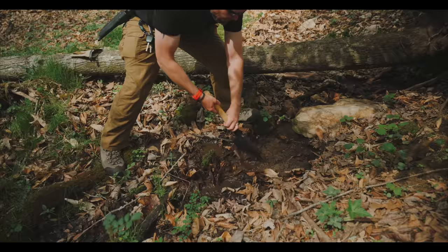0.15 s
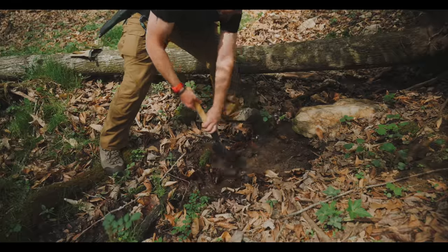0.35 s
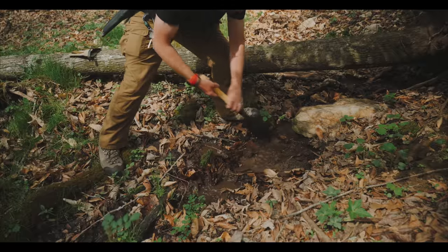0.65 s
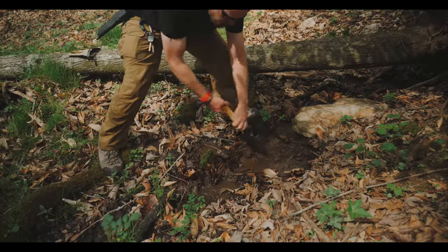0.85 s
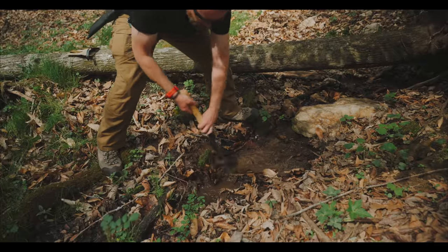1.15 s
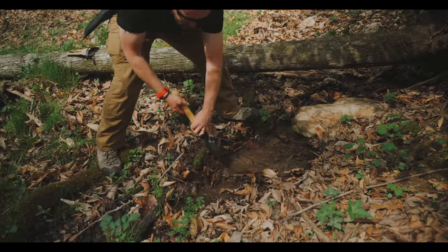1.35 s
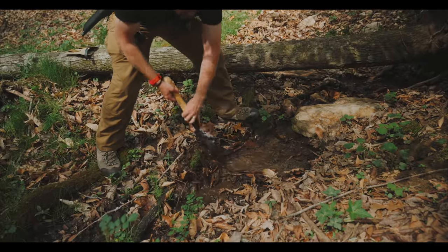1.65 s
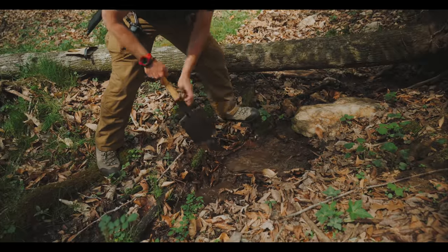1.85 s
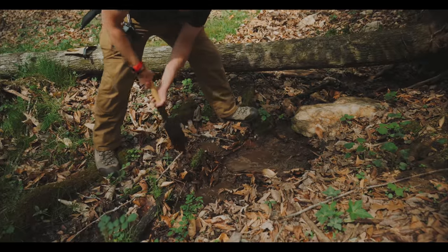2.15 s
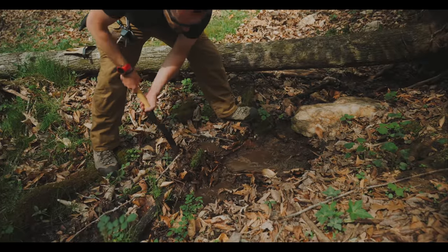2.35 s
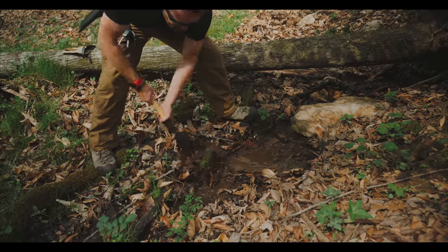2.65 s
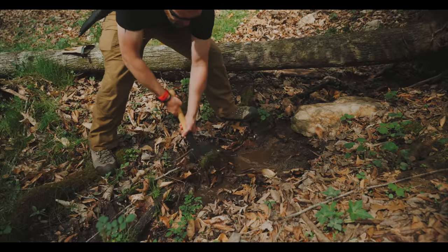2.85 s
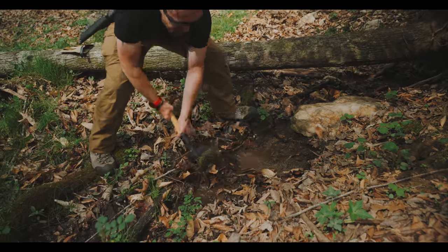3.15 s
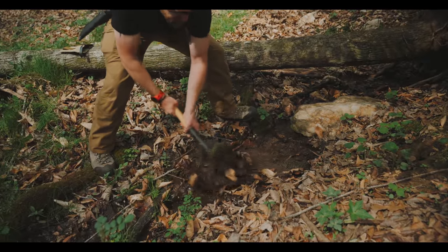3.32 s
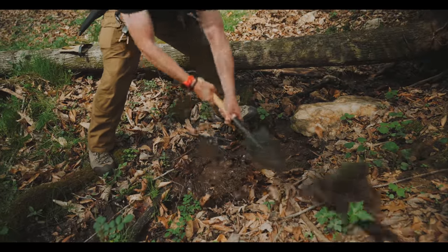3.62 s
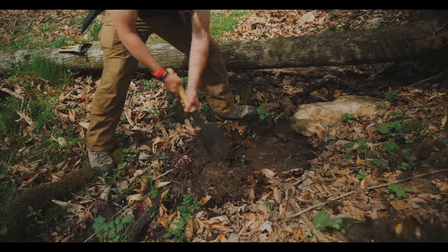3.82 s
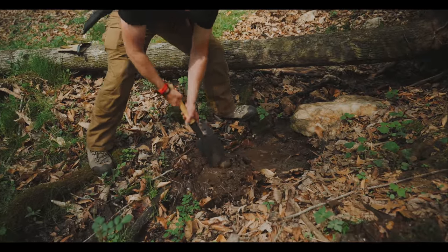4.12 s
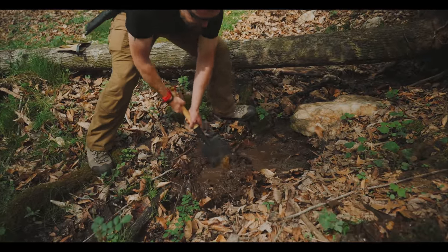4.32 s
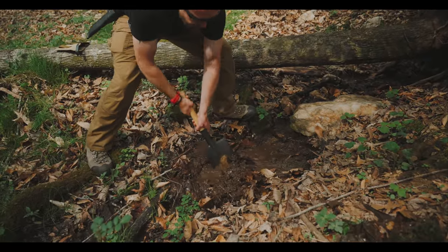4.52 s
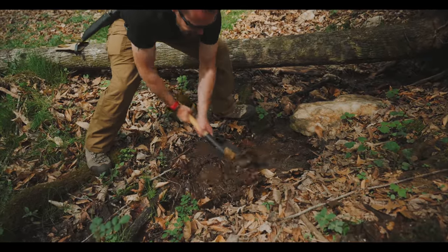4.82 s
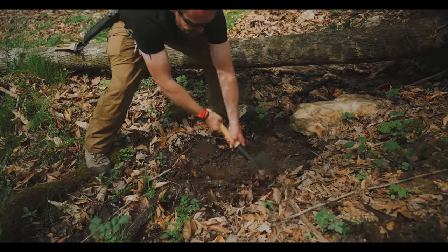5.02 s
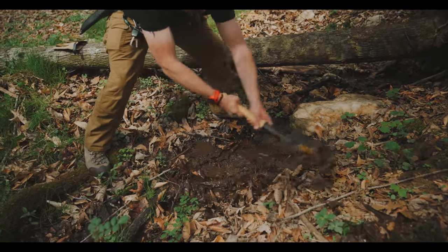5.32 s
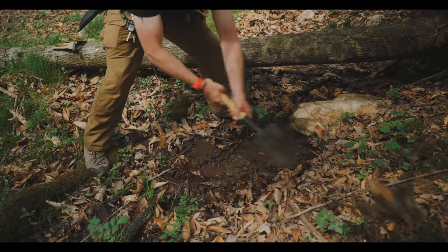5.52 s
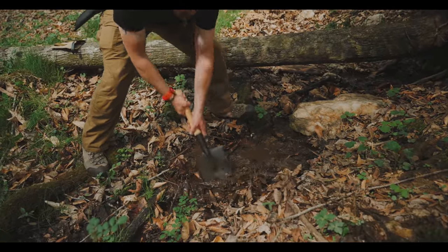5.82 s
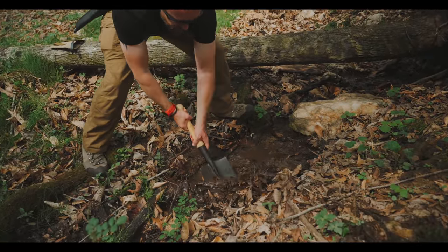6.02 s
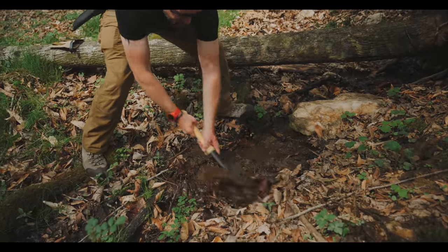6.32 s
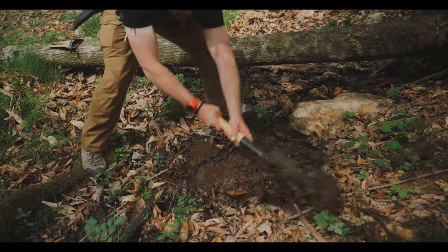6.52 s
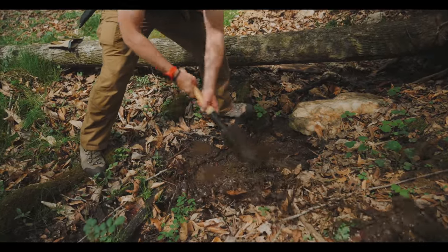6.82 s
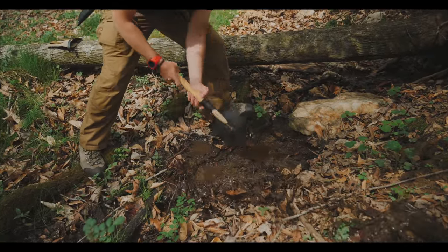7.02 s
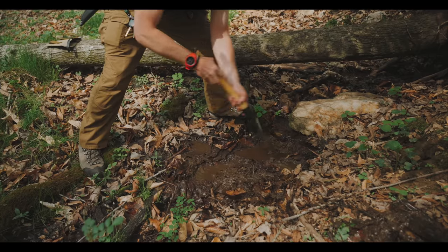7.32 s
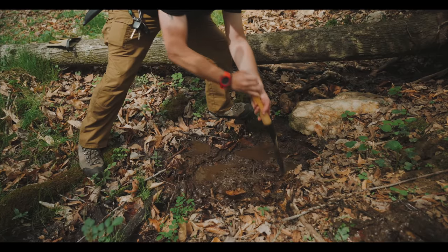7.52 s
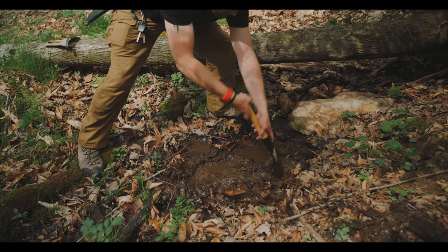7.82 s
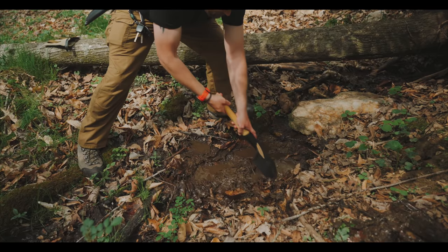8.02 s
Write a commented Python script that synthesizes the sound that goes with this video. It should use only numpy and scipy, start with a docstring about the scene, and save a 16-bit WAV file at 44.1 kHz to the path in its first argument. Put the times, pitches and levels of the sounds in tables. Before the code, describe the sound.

Close-up digging in a wood. Loud, clattering stone blows come first, then a strong crunch, lighter scrapes, and another run of thuds midway. Thrown earth scatters crisply over leaves, crumbs trickle, and pebbles ping faintly on the blade. The end is sparse, with small ticks and a last soft bite. Dry, close outdoor sound with faint air hiss and low wind bumps.

```python
"""Stones knock a small steel shovel as it chops and scrapes wet, stony mud in a wood and throws it on dry leaves.
Blows are noise bursts through a thud band, stone rings and blade modes; crackle is grainy, coloured noise
with single crumbs. Decaying sines give gliding plops of air pockets and faint steady rings and squeaks,
some of them the blade; short noise ticks snap, and pebbles ring the lifted blade.
Light wind thumps on the microphone over a faint outdoor hiss."""
import sys
import numpy as np
from scipy import signal
from scipy.io import wavfile

SR = 44100
rng = np.random.default_rng(int(sys.argv[2]) if len(sys.argv) > 2 else 0)


def output_pcm(signal):
    """Save a mono or channel-first signal as 16-bit PCM at the path in sys.argv[1].

    Samples are clipped to [-1, 1] before scaling.
    """
    pcm = np.clip(np.atleast_2d(signal).T, -1, 1) * 32767
    wavfile.write(sys.argv[1], SR, np.round(pcm).astype(np.int16))


N = 359856

# blows on stones and clods: start_s, peak_db, thud_hz, grit_db, length_s
BLOWS = [(0.052, -9, 2040, 28, 0.016), (0.095, -1.5, 2150, -2, 0.016), (0.117, 4.5, 2880, 8, 0.008),
         (0.126, 0, 2400, 28, 0.0098), (0.139, -8, 2100, -10, 0.0028), (0.158, 0.5, 2080, 12, 0.0067),
         (0.1485, 3, 2120, 0, 0.0051), (0.181, 4, 1470, 15, 0.015), (0.194, -0.5, 2150, 18, 0.011),
         (0.2203, 0.5, 2250, -8, 0.004), (0.234, 1, 2400, 37, 0.015), (0.269, -8, 1700, -7, 0.0028),
         (0.883, -12.5, 2600, -2, 0.017), (0.8934, -0.5, 3030, 5, 0.009), (1.0005, 4, 2100, -1, 0.0038),
         (1.009, -4, 1950, -6.5, 0.032), (1.034, 2.5, 2280, 8, 0.012), (1.1163, -1, 2455, -3.5, 0.0036),
         (1.45, -13.5, 4120, 5, 0.015), (2.051, -14, 3220, -9, 0.0064), (2.588, -15.5, 2500, -10, 0.0052),
         (3.309, -22.5, 2360, -3.5, 0.027), (3.459, -6, 3140, 37.5, 0.0089), (3.704, -9.5, 3790, -20, 0.01),
         (4.154, 0.5, 2040, -6, 0.0053), (4.213, -3, 1466, -5.5, 0.024), (4.259, -12, 1420, -7.5, 0.022),
         (4.383, -5.5, 1880, -5, 0.039), (4.518, -10, 2060, 4, 0.0087), (4.805, -2, 1530, -8, 0.0025),
         (4.931, 0.5, 1460, -3.5, 0.0058), (5.06, -12, 3440, -2, 0.0082), (5.41, -12.5, 3440, -25, 0.0083),
         (5.9, 1, 2254, -11, 0.0089), (5.91, -7.5, 340, 3, 0.0085), (5.963, -13, 1315, -17, 0.0074),
         (8.014, -22.5, 1850, -9, 0.012), (8.039, -7.5, 2840, 2, 0.0065), (8.084, -17, 3330, 4.5, 0.011)]


def amp(db):
    """Decibels to gain."""
    return 10 ** (np.asarray(db) / 20)


def evened(x):
    """Scales to unit rms."""
    return x / np.sqrt(np.mean(x ** 2) + 1e-20)


def add(mix, start_s, sound):
    """Mixes a sound in at start_s."""
    part = mix[round(start_s * SR):][:len(sound)]
    part += sound[:len(part)]


def coloured(x, spectrum):
    """Causal minimum-phase filter of unit energy with the given spectrum."""
    hz, db = np.transpose(spectrum)
    grid_hz = abs(np.fft.fftfreq(4096, 1 / SR))
    log_gain = np.log(amp(np.interp(np.log(grid_hz + 1), np.log(hz), db)))
    response = np.exp(np.conj(signal.hilbert(log_gain)))
    fir = np.fft.ifft(response).real[:2048]
    return signal.oaconvolve(x, fir / np.linalg.norm(fir))[:len(x)]


def impacts(per_s, spread_db):
    """Random impulses at a mean rate, a few of them large."""
    size = amp(spread_db * np.minimum(rng.exponential(1, N), 4))
    return size * (rng.random(N) < per_s / SR)


def grains(per_s, spread_db, decay_s):
    """An envelope of random little impacts, each swelling and dying fast."""
    power = impacts(per_s, spread_db) ** 2
    pole = [1, -amp(-200 / (decay_s * SR))]
    for _ in range(2):
        power = signal.lfilter([1], pole, power)
    return evened(np.sqrt(power))


def ring(modes, sharp_db_per_oct=0, freedom=1, luck_db=0):
    """Decaying sine modes after one tap; a sharp tap reaches the high modes, freedom scales t60."""
    t = np.arange(SR // 2) / SR
    hz, db, t60_s = np.transpose(modes)[:, :, None]
    db = db + sharp_db_per_oct * np.log2(hz / 5000) + luck_db
    partials = amp(db - 60 * t / (t60_s * freedom)) * np.sin(2 * np.pi * hz * t)
    return partials.sum(0) / np.linalg.norm(amp(db))


def crumbs(per_s, spread_db):
    """Single crumbs: short ticks of a few cycles, each at one of 24 pitches."""
    size = impacts(per_s, spread_db)
    kind = rng.integers(0, 24, N)
    out, t = np.zeros(N), np.arange(SR // 50) / SR
    for k, hz in enumerate(np.geomspace(1200, 7500, num=24)):
        cycles = hz * t
        tick = np.sqrt(hz) * cycles * np.exp(-cycles / 1.6) * np.sin(2 * np.pi * cycles)
        out += signal.oaconvolve(size * (kind == k), tick)[:N]
    return evened(out)


def motion():
    """Level and dryness of moving grit: showers swell and die, their power weights the dryness."""
    # scrapes, slides and showers of soil: peak_s, relative level_db,
    # rise_s from 20 dB down, fall_s to 20 dB down (signs of both ignored), leaves_to_earth_db
    showers = [(.04, -26, 7, 0.34, 20.5), (0.201, -15.5, 0.37, 0.064, -2.5), (.325, -23, .03, .04, 3),
               (.4, -34, .3, .35, 3), (.545, -19, .025, .11, 5), (0.991, -6, 0.0321, 0.07, -3),
               (1.124, -14.5, -0.01, 0.12, -4), (0.954, -11.5, -0.0172, 0.12, 9),
               (1.47, -20.5, 0.0547, 0.03, 7), (1.731, -38.5, 1.06, 0.4, 8), (2.11, -43, 0.1, 0.6, 7),
               (2.489, -17, 0.0469, 0.0561, 3), (2.605, -23, 0.1162, 0.12, 5),
               (2.776, -26.5, 0.07, 0.26, 1.5), (3.44, -25.5, 0.31, .5, 3.5),
               (3.777, -9.5, 0.1736, 0.0743, 0.5), (3.952, -27, .5, 0.04, -2), (4.56, -27, 0.22, 0.07, 4),
               (4.2, -33, 1.34, 0.13, -2), (4.743, -31.5, .07, .5, -0.5), (4.95, -19.5, 0.1354, 0.25, 0),
               (5.278, -28.5, 0.2, 0.76, 8), (5.666, -19, 0.1459, 0.077, -4.5),
               (5.949, -33, 0.3, 0.09, -6.5), (6.28, -34.5, 0.23, 0.8, 8.5), (6.37, -13, .04, .2, 6),
               (6.45, -11, .1, .1, 3), (6.618, -26.5, 0.14, 0.34, 5.5), (6.746, -23, 0.11, 0.26, -2),
               (6.889, -28.5, 0.17, 0.17, 4), (7.38, -46, 0.5, 0, 8), (7.585, -30, .01, .08, 5),
               (7.625, -23, .035, .05, -3), (7.66, -23, .03, .045, -5), (7.53, -45, -0.24, 1, 10),
               (7.85, -44, 0.3, 16, 12.5), (8.05, -39, -0.44, 17, 1)]
    bend = 1.28  # above 1: rounded peak, ever faster stop
    peak_s, db, rise_s, fall_s, dry_db = np.transpose(showers)[:, :, None]
    t = np.arange(0, N + 64, 64) / SR
    away = np.maximum((peak_s - t) / abs(rise_s), (t - peak_s) / abs(fall_s))
    power = amp(db - 20 * away ** bend) ** 2
    total = power.sum(0)
    level_db = 10 * np.log10(total)
    mean_dry_db = (power * dry_db).sum(0) / total
    return [np.interp(np.arange(N) / SR, t, curve) for curve in (level_db, mean_dry_db)]


def crackle():
    """Grit and leaves on the move: clumped grains in two colours with single crumbs on top."""
    # wet earth: freq_hz, relative density_db (per Hz)
    dull = [(263, -23.5), (430, -10), (640, -11), (938, -4.5), (1810, -4), (4050, -6.5), (7000, -10.5),
            (9100, -16), (15400, -120)]
    # dry leaves and sand: freq_hz, relative density_db (per Hz)
    crisp = [(1760, -17.5), (3000, -6.5), (4500, -7), (12300, -8.5), (13600, -9.5), (16000, -17)]
    level_db, dry_db = motion()
    clumps = 1.5 + grains(90, 2.5, .03)
    earth = rng.standard_normal(N) * clumps * grains(900, 2.6, .018)
    leaves = rng.standard_normal(N) * clumps * grains(1800, 2.1, .009)
    # a thin trickle shows its single crumbs best
    loose = amp(-1.5 - .35 * (level_db + 35)) * crumbs(320, 4.5)
    low = evened(coloured(earth, dull)) + loose
    high = evened(coloured(leaves, crisp))
    tilt = amp(dry_db / 2)
    return amp(level_db - 8.5) * (low / tilt + tilt * high)


def wind():
    """Lumpy gusts over a light breeze; the microphone's bass cut leaves a thump near 70 Hz."""
    # gusts: middle_s, level_db, half_length_s
    gust_rows = [(3.693, -50.5, 0.046), (3.86, -46, 0.061), (5.77, -57, 0.064), (6.613, -43.5, 0.094),
                 (6.87, -57, 0.1), (7.189, -41, 0.037), (7.336, -41, 0.063)]
    spectrum = [(20, -8), (45, -46), (72, 38.0), (90, 13.5), (130, -32), (400, -75)]  # freq_hz, relative_db
    thump = coloured(rng.standard_normal(N), spectrum)
    t = np.arange(N) / SR
    gusts = sum(amp(db) * np.exp(-((t - mid_s) / half_s) ** 2) for mid_s, db, half_s in gust_rows)
    return (amp(-68.0) + gusts) * evened(thump)


def hiss():
    """Faint outdoor hiss: steady coloured noise."""
    # hiss: freq_hz, relative density_db (per Hz)
    spectrum = [(53, -78), (90, -10), (419, -9.5), (690, -19), (876, -10.5), (1090, -13.5), (16000, -19)]
    return amp(-54.5) * evened(coloured(rng.standard_normal(N), spectrum))


def knocks():
    """A ragged noise push drives a hollow thud, a ringing stone, a spray of grit and the steel."""
    # blade against the soil: mode_hz, relative level_db, t60_s before the freedom factor
    grounded = [(436, -12, .05), (850, -3, .045), (1340, -10, .04), (2030, -1, .065), (2620, -10, .04),
                (3530, -9, .035), (4240, -14, .04), (6500, -12, .04), (8150, -12, .03)]
    # bare blade, bright: ring_db, sharp_db_per_oct, freedom (factor on t60)
    bare = (-9, 1, .9)
    # blade caked with mud, short and low: ring_db, sharp_db_per_oct, freedom (factor on t60)
    caked = (-12, -2.5, .7)
    caked_from_s = 1.3
    out, t = np.zeros(N), np.arange(SR // 8) / SR
    noise = rng.standard_normal((len(BLOWS), len(t)))
    luck_db = 1.8 * rng.standard_normal((len(BLOWS), len(grounded), 1))
    ragged = .5 + grains(400, 2.4, .015)
    octaves = rng.uniform(-.4, 1.1, (len(BLOWS), 6))  # every stone has a few short rings of its own
    for (start_s, db, hz, grit_db, length_s), z, chance_db, own in zip(BLOWS, noise, luck_db, octaves):
        ring_db, sharp_db, freedom = bare if start_s < caked_from_s else caked
        sharp_db += 3 * np.log2(hz / 2000)  # a small hard stone reaches the high modes

        # a long crunch starts softly, holds its level, then stops short
        drawn = np.clip(length_s / .008, 1, 4)
        attack = np.minimum(t / (.0006 * drawn ** 1.5), 1)
        decay = np.exp(-(t / max(length_s, .001)) ** drawn)
        first_bite = 1.8 / drawn * np.exp(-t / .0015)
        bites = np.resize(ragged[round(start_s * SR):], len(t)) + first_bite
        push = attack * decay * z * bites

        band = signal.butter(2, [hz / 1.98, min(hz * 1.91, SR / 3)], "band", fs=SR, output="sos")
        thud = signal.sosfilt(band, push) * np.sqrt(SR / 4 / hz)
        grit = amp(grit_db) * signal.lfilter([1, -1], [1, -.7], push)
        blade = ring(grounded, sharp_db, freedom, chance_db)
        steel = signal.oaconvolve(push / np.linalg.norm(push), blade)
        stone_ring = ring([(f, 0, .035) for f in hz * 2 ** own])[:len(t)]
        stone = signal.oaconvolve(push, stone_ring)[:len(t)]
        stone *= np.linalg.norm(thud) / np.linalg.norm(stone)
        crunch = .8 * thud + .65 * stone + grit
        add(out, start_s, amp(db) * crunch / abs(crunch).max())
        # a long crunch keeps feeding the steel
        add(out, start_s, amp(db + ring_db) * np.sqrt(drawn) * steel)
    return out


def tones():
    """Decaying sines: glides for plopping air pockets, softer onsets for faint steady rings and squeaks."""
    # gliding plops of air pockets, and faint steady rings and squeaks, some of them the blade:
    # start_s, peak_db, start_hz, rise_oct_per_s, t60_s
    tone_rows = [(.313, -22, 1200, 3, .04), (.4575, -17, 880, 46, .07), (.527, -17, 2150, -12, .05),
                 (.5355, -4, 1650, 4, .016), (4.9305, -1, 950, 2, .035), (5.064, -18, 600, -5, .06),
                 (2.053, -21, 3144, .1, .09), (8.029, -19, 1980, 1, .05), (4.23, -32, 6720, 0, .13),
                 (7.045, -31, 1250, 0, .07), (7.045, -33, 960, 0, .14), (7.0, -51, 2160, 0, 2),
                 (7.295, -44, 2180, 0, .25)]
    out, t = np.zeros(N), np.arange(SR // 2) / SR
    for start_s, db, hz, rise, t60_s in tone_rows:
        turns = np.cumsum(hz * 2 ** np.minimum(rise * t, 2)) / SR  # rises two octaves at most
        attack = np.minimum(t / (.0015 if rise else .012), 1)
        add(out, start_s, amp(db - 60 * t / t60_s) * attack * np.sin(2 * np.pi * turns))
    return out


def snaps():
    """A tick of noise that rings for a few cycles around its own pitch."""
    # twigs, leaves and small stones: start_s, peak_db, pitch_hz
    ticks = [(.573, -16, 2500), (2.485, -20, 1630), (2.604, -15, 2010), (2.773, -15.5, 2980),
             (2.789, -16.5, 1720), (3.207, -23.5, 3750), (3.376, -23.5, 1890), (3.407, -17, 4900),
             (3.525, -15.5, 4860), (4.265, -15.5, 1760), (4.566, -17, 2280), (5.037, -17, 2260),
             (5.276, -17.5, 1880), (5.881, -14.5, 3800), (6.326, -29, 2000), (6.34, -15, 2720),
             (6.362, -6.5, 2540), (6.783, -15.5, 2380), (6.895, -10, 3320), (7.168, -31.5, 3430),
             (7.51, -21.5, 2450)]
    out, t = np.zeros(N), np.arange(SR // 40) / SR
    noise = rng.standard_normal((len(ticks), len(t)))
    for (start_s, db, hz), z in zip(ticks, noise):
        band = signal.butter(2, [hz / 1.35, hz * 1.45], "band", fs=SR, output="sos")
        push = z * np.exp(-t / .002)
        edge = evened(np.diff(push, prepend=0))
        tick = evened(signal.sosfilt(band, push)) + .3 * edge
        add(out, start_s, amp(db) * tick / abs(tick).max())
    return out


def taps():
    """Pebbles tick the lifted blade; mud on it adds damping to every mode."""
    # blade in the air: mode_hz, relative level_db, t60_s without mud
    blade = [(960, -21, .2), (1217, -25, 3), (1970, -20, 1.5), (2300, -15, .16), (3110, -8, .16),
             (3400, -11, .12), (4517, -5, .24), (5195, -14, .06), (5679, -1, .22), (6724, -4, .2),
             (7940, -18, .17), (10340, -13, .19), (10670, -9, .08)]
    # pebbles: start_s, ring_db, sharp_db_per_oct, t60_s that the mud allows
    pebbles = [(1.825, -25, -.5, 5), (2.053, -22, -9, .1), (4.155, -11, -2.5, .14), (7.168, -47, -12, .5)]
    out = np.zeros(N)
    for start_s, db, sharp_db, mud_s in pebbles:
        until_s = min(row[0] for row in BLOWS if row[0] > start_s + .02)  # the next blow stills the blade
        damped = [(hz, mode_db, 1 / (1 / t60_s + 1 / mud_s)) for hz, mode_db, t60_s in blade]
        steel = ring(damped, sharp_db)
        add(out, start_s, amp(db) * steel[:round((until_s - start_s) * SR)])
    return out


def scene():
    """The digging close by, with wind and hiss."""
    bass_cut = signal.butter(3, 320, "high", fs=SR, output="sos")  # small things give little bass
    close = signal.sosfilt(bass_cut, crackle() + knocks() + tones() + snaps() + taps())
    return (close + wind() + hiss())[None]


def record(dry):
    """The loudest peaks flatten towards full scale; then a bass cut and the band limit."""
    held = dry / (1 + abs(dry) ** 4) ** (1 / 4)
    held = signal.sosfilt(signal.butter(2, 45, "high", fs=SR, output="sos"), held)
    low_pass = signal.firwin(511, 15850, window=("kaiser", 9), fs=SR)
    return signal.oaconvolve(held, low_pass[None], "same")


dry = scene()
out = record(dry)
output_pcm(out)
```